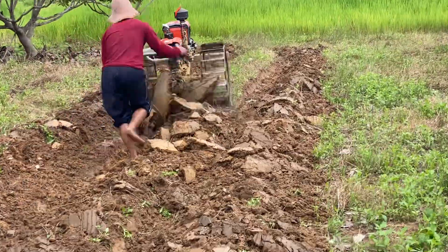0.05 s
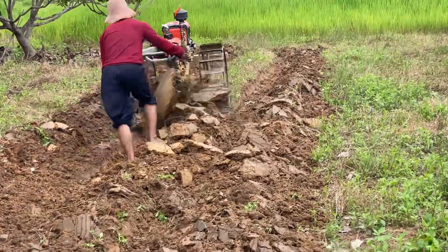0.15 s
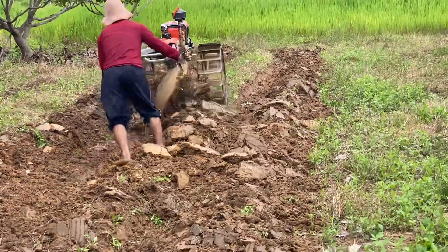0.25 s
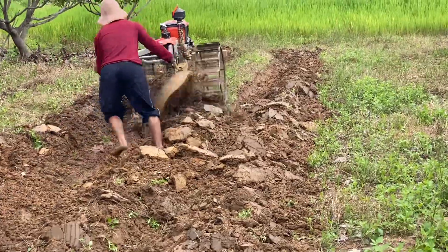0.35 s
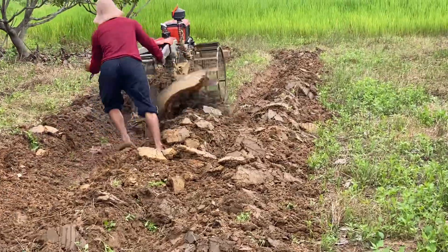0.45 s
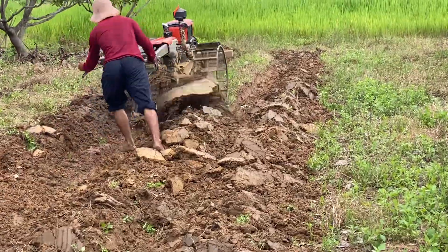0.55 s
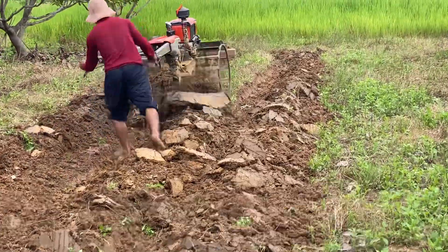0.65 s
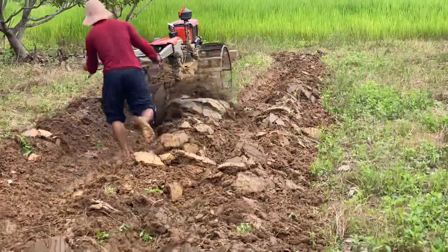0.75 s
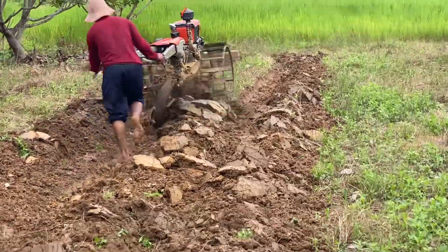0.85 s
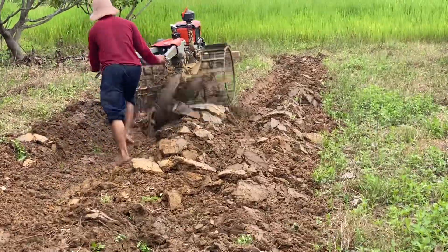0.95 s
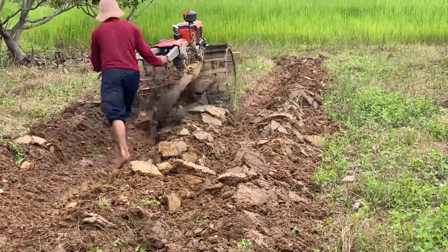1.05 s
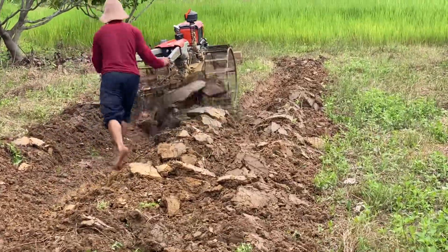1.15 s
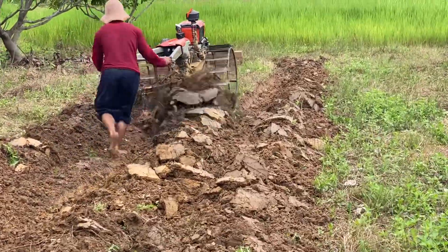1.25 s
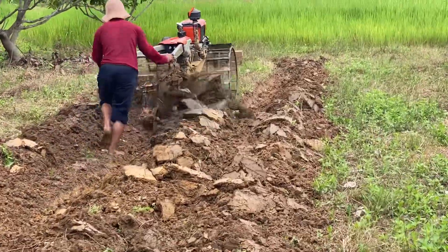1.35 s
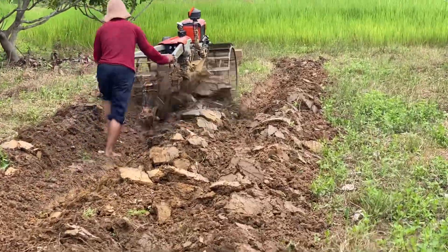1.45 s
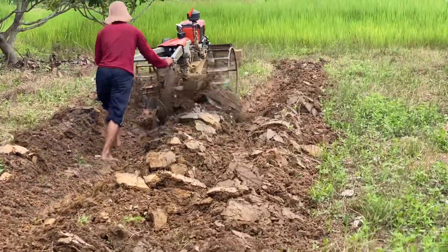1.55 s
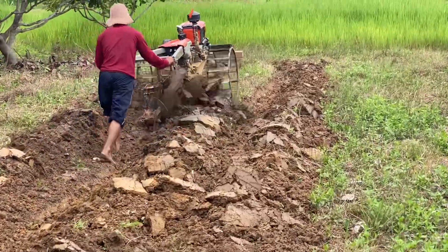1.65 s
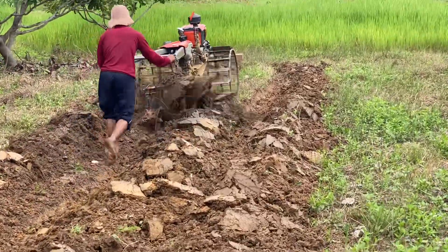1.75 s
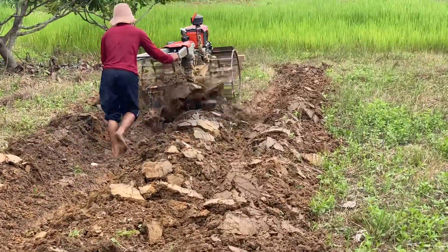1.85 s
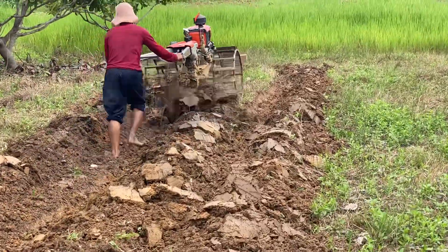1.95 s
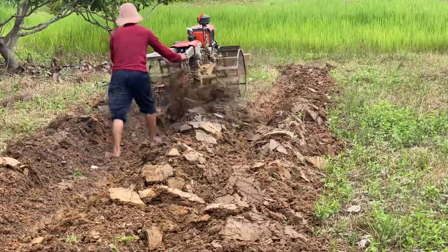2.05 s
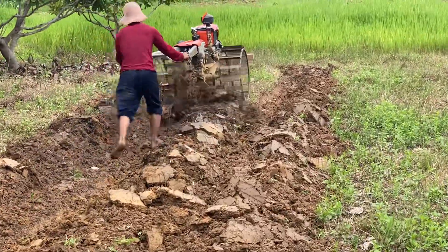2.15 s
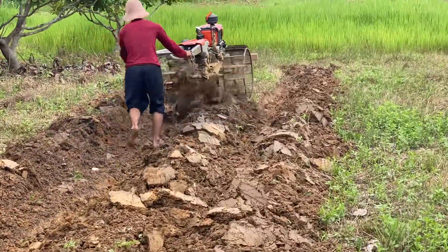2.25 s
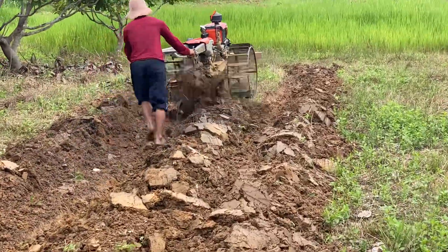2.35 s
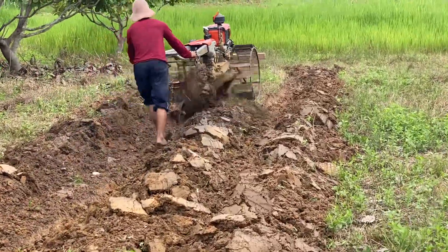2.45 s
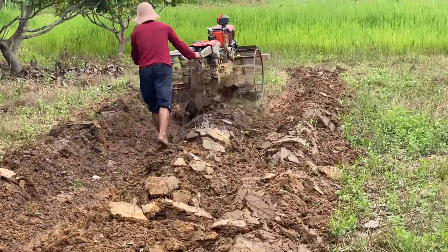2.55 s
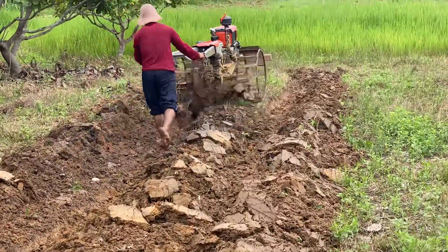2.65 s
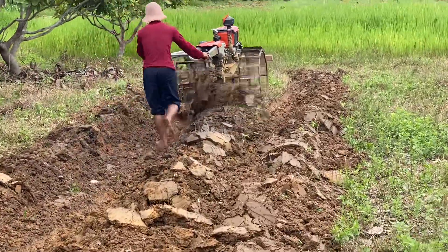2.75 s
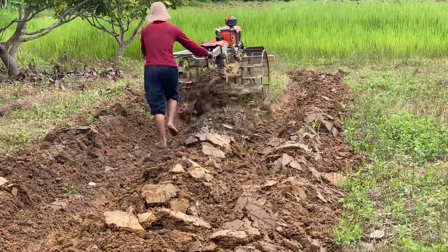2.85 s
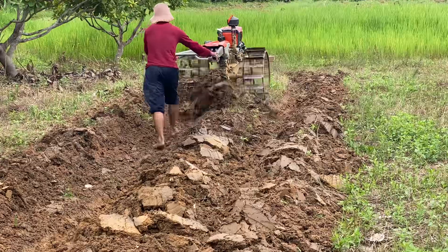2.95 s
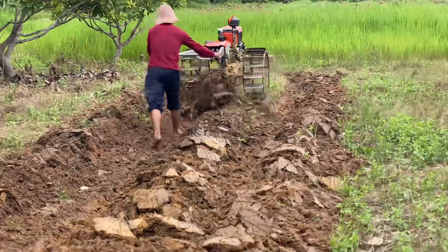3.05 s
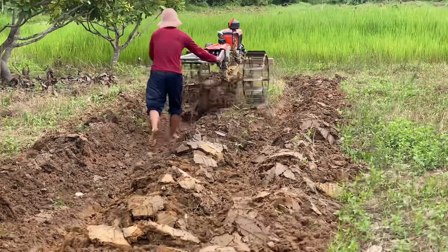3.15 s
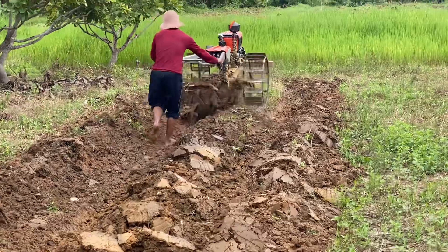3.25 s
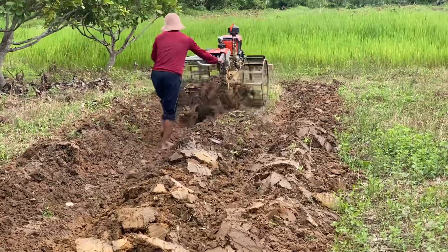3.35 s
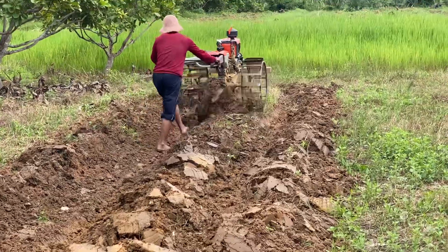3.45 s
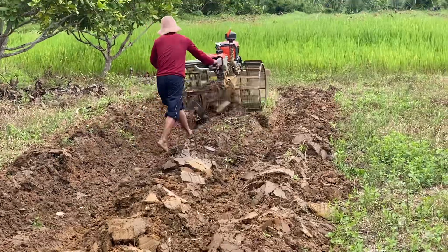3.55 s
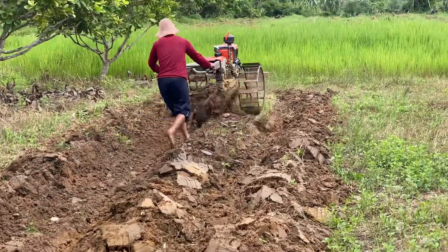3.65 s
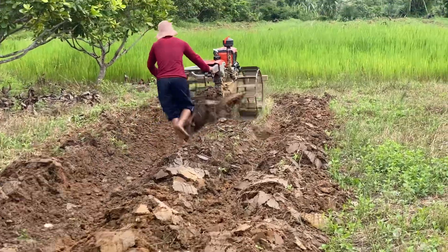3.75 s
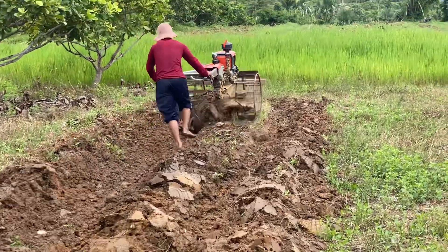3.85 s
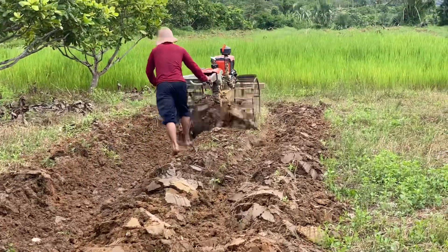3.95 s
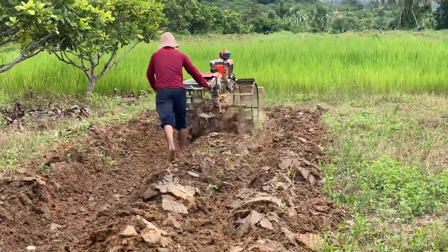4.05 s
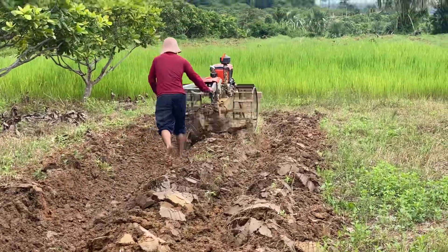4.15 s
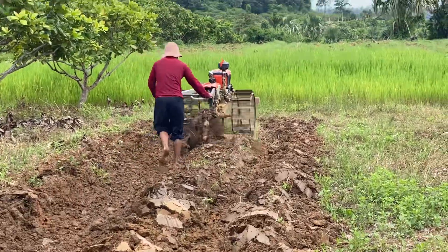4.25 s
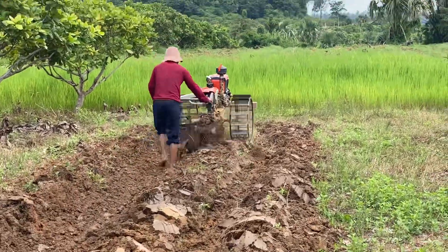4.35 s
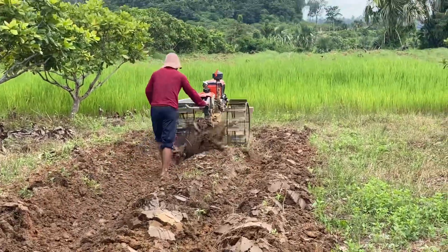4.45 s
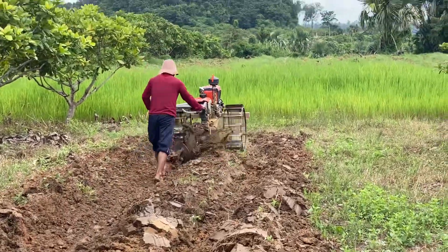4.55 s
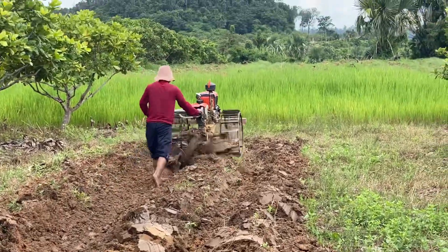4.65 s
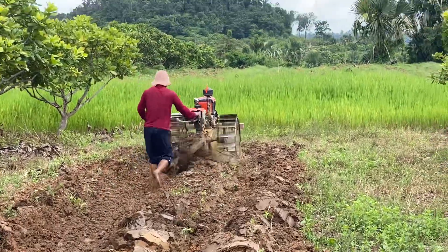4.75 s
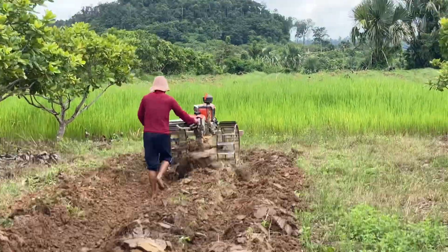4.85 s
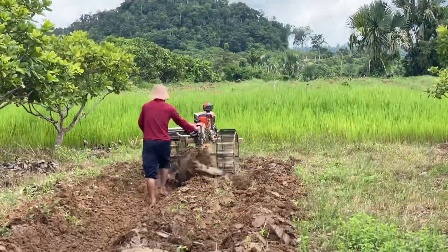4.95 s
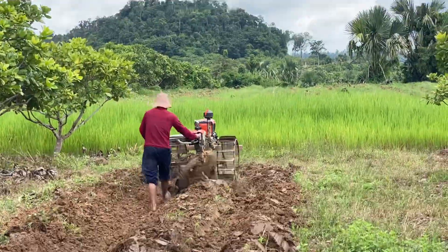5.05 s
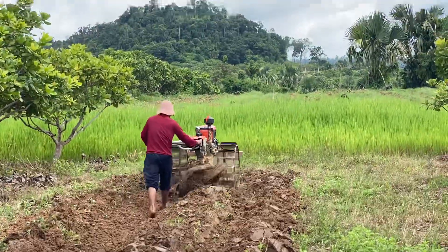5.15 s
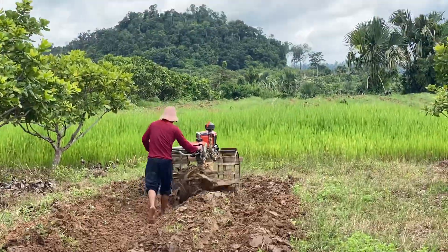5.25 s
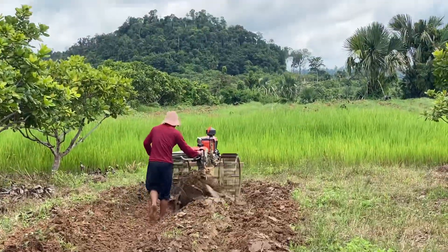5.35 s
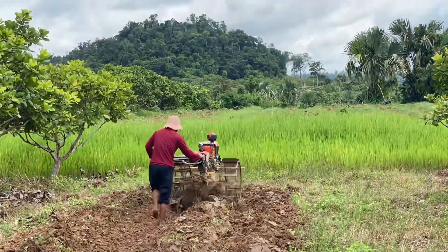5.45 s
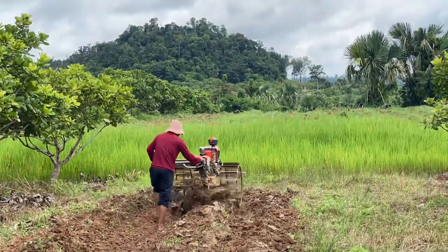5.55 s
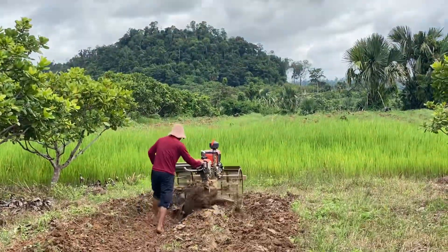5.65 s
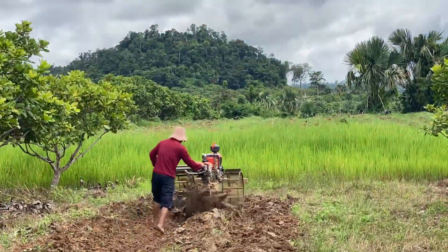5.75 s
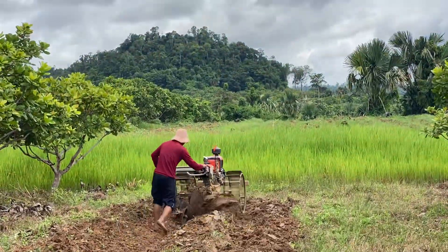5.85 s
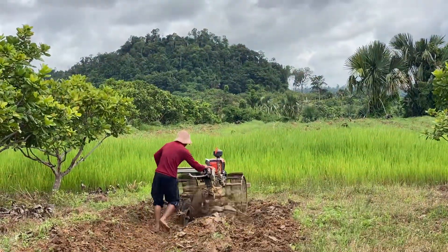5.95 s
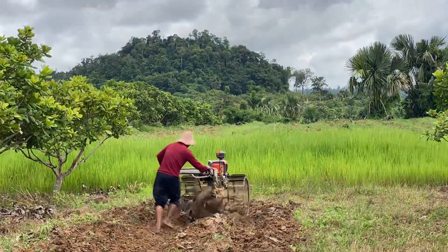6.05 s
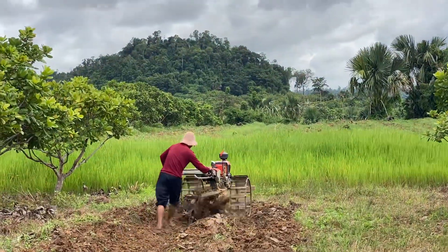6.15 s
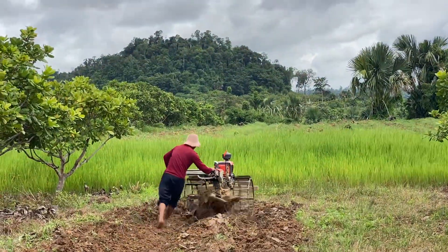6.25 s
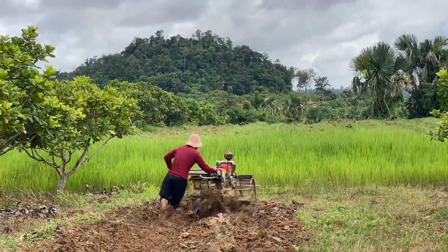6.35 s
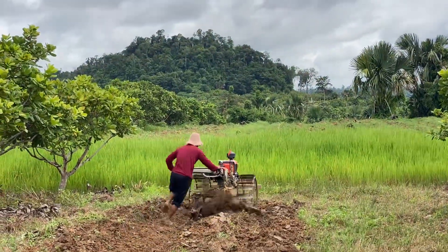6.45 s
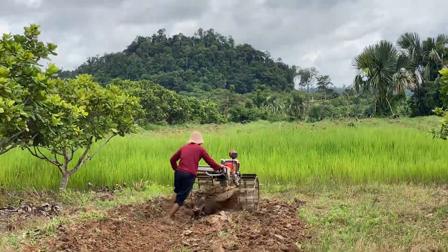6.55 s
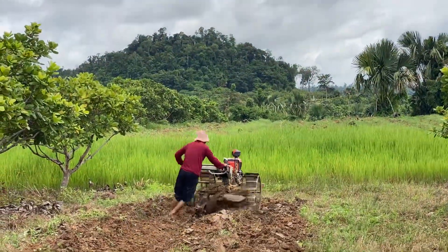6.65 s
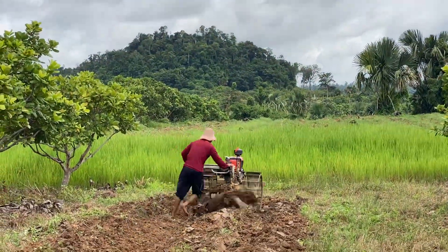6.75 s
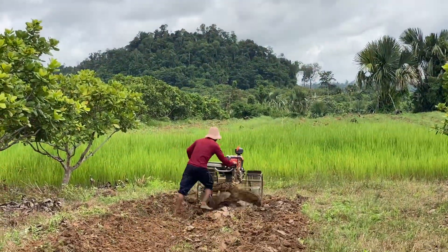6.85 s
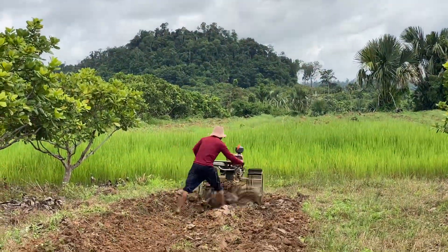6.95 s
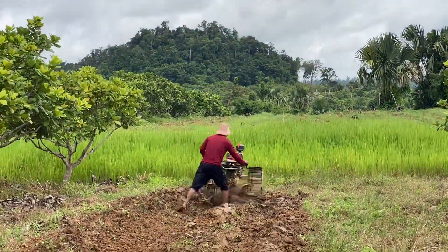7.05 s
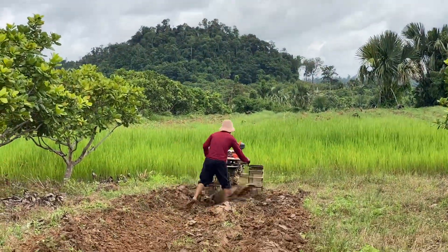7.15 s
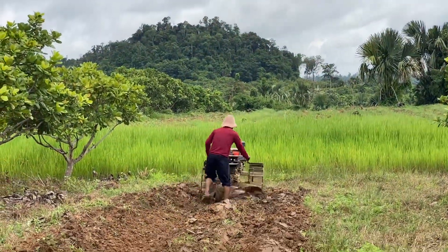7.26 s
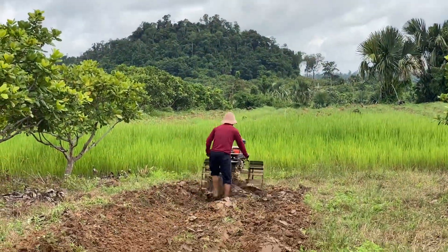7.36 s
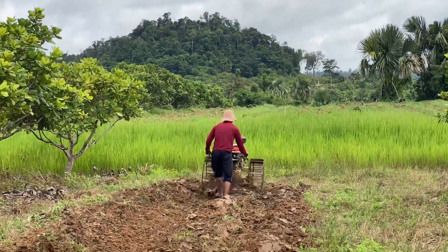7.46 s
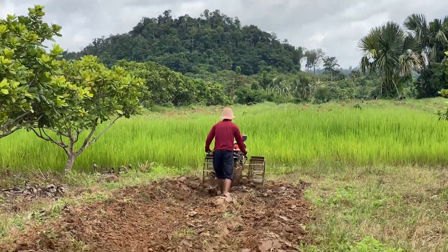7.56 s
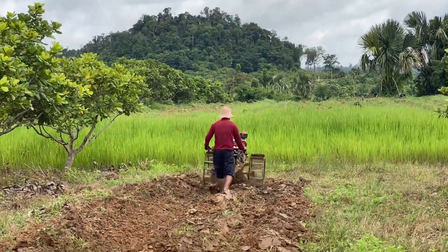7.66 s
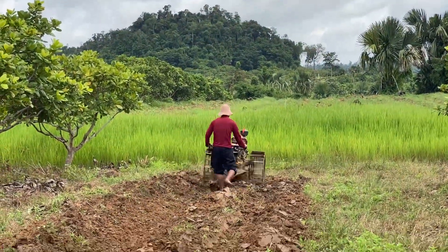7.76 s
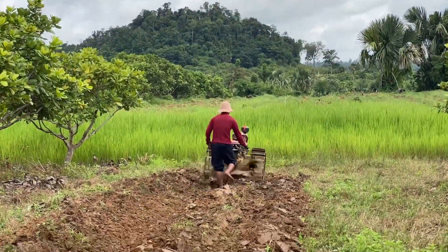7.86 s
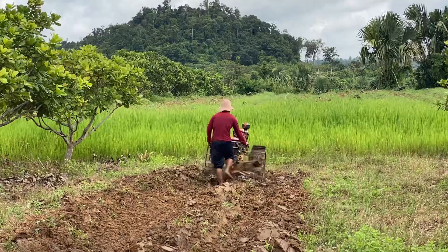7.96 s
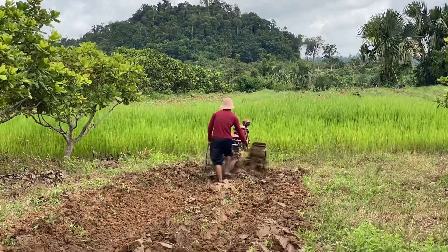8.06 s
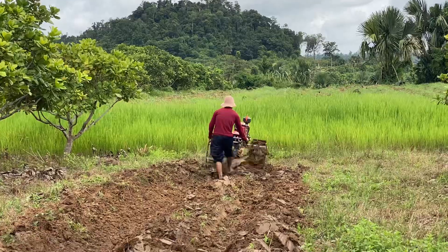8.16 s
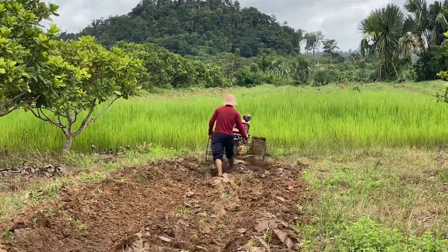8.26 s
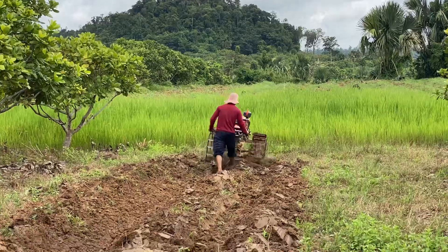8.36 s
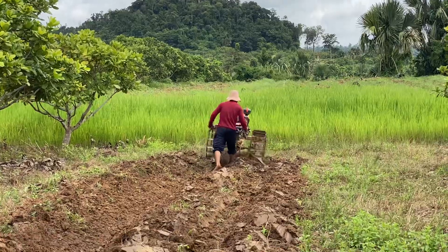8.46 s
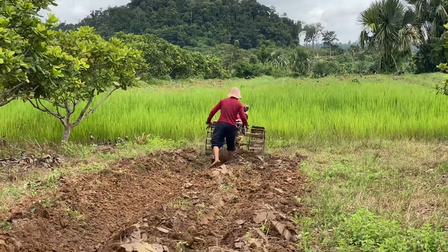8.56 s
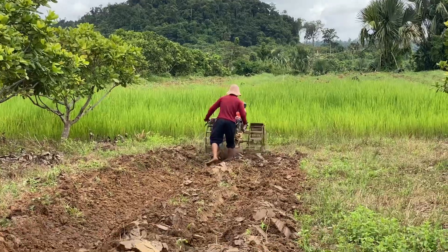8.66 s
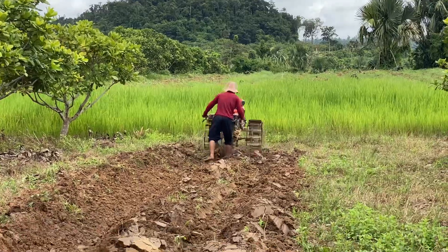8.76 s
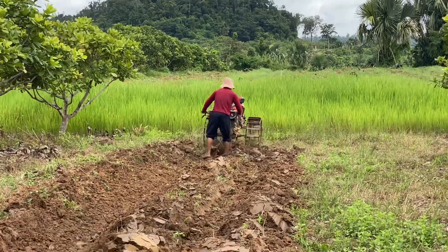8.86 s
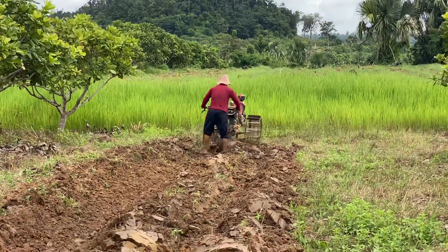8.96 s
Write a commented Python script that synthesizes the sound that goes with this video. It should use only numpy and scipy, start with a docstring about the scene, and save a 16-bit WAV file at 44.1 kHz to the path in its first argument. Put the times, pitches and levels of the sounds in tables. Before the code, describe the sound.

A single-cylinder diesel walking tractor plows an open field a few meters straight ahead of the microphone. It chugs rapidly, with deep exhaust thuds, hard knocking and rattling metal covers. After about three seconds the engine briefly eases off, then picks up at a slower, laboring beat and gradually moves away. A faint, thin belt squeal, occasional clanks and a few gritty scrapes through dry soil accompany it.

```python
"""The thud and knock of a single-cylinder four-stroke diesel, about nine firings a second, towing a plough.
Each cycle combustion rings the block, exhaust gas thuds and spits, the intake gulps, valves and covers
clack. After three seconds the governor briefly cuts the fuel; the engine then runs slower and draws away
across the field. Behind it gears chatter, a slipping belt squeals, a loose guard sings, a dry joint
chirps for a second and the plough now and then scrapes through clods."""
import sys
import numpy as np
from scipy import signal
from scipy.fft import rfft, irfft, next_fast_len
from scipy.io import wavfile
from scipy.ndimage import uniform_filter1d

SR = 44100
rng = np.random.default_rng(int(sys.argv[2]) if len(sys.argv) > 2 else 0)


def transcribe(signal):
    """Save signal, clipped to [-1, 1], as a 16-bit WAV file at the path in sys.argv[1]."""
    frames = np.atleast_2d(signal).T
    limited = np.clip(frames, -1, 1)
    pcm = np.round(limited * 32767).astype(np.int16)
    wavfile.write(sys.argv[1], SR, pcm)


N = 397773
TIME_S = np.arange(N) / SR
FFT_SIZE = next_fast_len(N + SR)
FREQ_HZ = np.maximum(np.arange(FFT_SIZE // 2 + 1) * SR / FFT_SIZE, 1e-3)


# silencer and pipe air modes: pitch_hz, width_hz, gain_db, polarity
PIPE_MODES = [(65.5, 21, 18, -1), (100.3, 13.2, 17, 1), (152.2, 34, 18, 1), (201.5, 14.4, 13.5, 1),
              (243, 18, 8, -1), (291, 25, 2.5, 1)]
# silencer shell modes: pitch_hz, width_hz, gain_db, polarity
SHELL_MODES = [(380, 113, -5, 1), (865, 60, -4.5, -1), (3100, 160, -48, 1)]
# gas bark: freq_hz, gain_db
BARK_SPECTRUM = [(150, 20), (280, 2), (420, 6.5), (650, -11), (1050, -3.5), (1450, 7), (1750, -18),
                 (3100, -27.5), (4000, -49), (9000, -68.5)]
# gas spit: freq_hz, gain_db
SPIT_SPECTRUM = [(380, -5), (540, 8), (750, -3), (1000, -20.5), (2000, -2.5), (3100, 0), (3700, -10),
                 (4600, -4.5), (5800, -10.5), (6650, -5), (7200, -16), (9500, -15), (13000, -37),
                 (15500, -25)]
# silencer rattle as the governor eases off: time_s, level_db
SILENCER_RATTLE = [(3.15, -68), (3.4, -47.5), (3.6, -57), (3.9, -60), (4.1, -78.5)]

def exhaust(fuel):
    """The valve opens: a slug of gas rings the silencer, with a rough bark and, under load, a spit."""
    opens_s = crank(0.216)
    load_db = 12 * (fuel - 1) + distance_db(opens_s)
    spit_db = -26 + 41.5 * (fuel - 1) + distance_db(opens_s)
    coasting = np.clip(1 - 2 * fuel, 0, 1)
    thud = slug(opens_s, load_db + 27 - 3 * coasting, PIPE_MODES)
    bark = burst(opens_s + 0.0019, load_db - 29, BARK_SPECTRUM,
                 rise_s=0.001, decay_s=0.021, tail_db=-12, tail_s=0.025, alike=0.092)
    spit = burst(opens_s + 0.0013, spit_db, SPIT_SPECTRUM,
                 rise_s=0.0031, decay_s=0.0023, tail_db=-25.5, tail_s=0.055, alike=0.56)
    # a slow, labouring engine blows down harder and shakes the metal too
    labour_db = -25 * speed_octaves(opens_s)
    shake_db = load_db + 1.5 + labour_db + 2 * rng.standard_normal(len(opens_s))
    shake = filtered(impulses(opens_s + 0.003314, shake_db), resonances(BLOCK_MODES + SHELL_MODES))
    rattle = noise(resonances(SHELL_MODES)) * undb(curve(SILENCER_RATTLE, TIME_S) + 4 * wander(41))
    return thud + bark + spit + shake + rattle


# air cleaner and inlet modes: pitch_hz, width_hz, gain_db, polarity
AIRBOX_MODES = [(106, 20.2, 18, -1), (134.8, 129, 9.5, 1), (241.4, 19, 7, -1)]
# air passing the inlet valve: freq_hz, gain_db
RUSH_SPECTRUM = [(300, 14), (700, -35), (1000, -2), (1250, 27), (1550, -1), (1900, -32), (3500, 8.5),
                 (8000, -35)]

def intake():
    """The inlet valve jolts the air column as it opens and as it shuts; air rushes in between."""
    opens_s, shuts_s = crank(0.502), crank(0.769)
    suction_db = 1.05 + 10.5 * speed_octaves(opens_s) + distance_db(opens_s)
    gulp = slug(opens_s, suction_db + 23.5, AIRBOX_MODES) + slug(shuts_s, suction_db + 25, AIRBOX_MODES)
    clack = burst(opens_s + 0.00162, 1.6 * suction_db - 33, BARK_SPECTRUM,
                  rise_s=0.00077, decay_s=0.005, tail_db=18, tail_s=0.0087, alike=0.53)
    rush = burst(crank(0.61), 0.82 * suction_db - 45, RUSH_SPECTRUM,
                 rise_s=0.015, decay_s=0.0091, tail_db=-38, tail_s=0.023, alike=0.31)
    return gulp + clack + rush


# cylinder block modes: pitch_hz, width_hz, gain_db, polarity
BLOCK_MODES = [(300, 43, -21, 1), (707, 35, -16.5, -1), (796, 29, -11.5, 1), (898, 33, -10.5, 1),
               (1158, 32, -11.5, -1), (1206, 52, -4, 1), (1304, 33, -17, 1), (1379, 32, -15, -1),
               (1438, 33, -6, -1), (1473, 28, -4.5, 1), (1522, 59, -0.5, -1), (1597, 73, -11, 1),
               (1810, 60, -18, -1), (2217, 59, -17.5, -1), (2773, 31, -17.5, -1), (3100, 35, -20, -1)]
# engine mount and frame modes: pitch_hz, width_hz, gain_db, polarity
FRAME_MODES = [(470, 45, -5, 1), (570, 37, -1, -1), (699, 48, -1.5, 1), (804, 29, 0, -1),
               (895, 45, -0.5, 1)]
# combustion crack: freq_hz, gain_db
CRACK_SPECTRUM = [(250, -23), (450, -1), (900, -4.5), (1200, -11), (1550, 11), (1750, -7.5), (2800, -9.5),
                  (3800, -20), (6500, -23.5), (9000, -45), (15000, -76)]
# hardness of the knock: time_s, gain_db
KNOCK_HARDNESS = [(0, -28), (1.77, -27), (1.88, -23), (2.3, -25.5), (2.5, -27), (2.7, -23), (3.15, -22),
                  (3.34, -42.5), (3.68, -42.5), (3.86, -29), (4.25, -32), (4.45, -32.5), (4.57, -28.5),
                  (6.9, -28.5), (7.55, -35), (8.19, -29.5), (8.33, -37.5), (8.7, -35)]

def combustion_knock():
    """Each firing cracks and rings block and covers; then the piston slaps and the frame is jolted."""
    fired_s, slaps_s = crank(0), crank(0.085)
    knock_jitter, slap_jitter, lag_jitter = rng.standard_normal((len(fired_s), 3)).T
    knock_db = curve(KNOCK_HARDNESS, fired_s) + distance_db(fired_s) + 0.5 * knock_jitter
    slap_db = 0.73 * knock_db + 21.5 + 2 * slap_jitter
    frame_db = 10.5 + 41 * (curve(GOVERNOR_FUEL, slaps_s) - 1) + distance_db(slaps_s)
    ring = strike(fired_s + 0.0008, knock_db + 47, BLOCK_MODES, scatter=0.1)
    slap = strike(slaps_s + 0.00201 * lag_jitter, slap_db, BLOCK_MODES, scatter=1.0)
    covers = strike(fired_s + 0.002013, 0.66 * knock_db + 20.5, COVER_MODES, scatter=0.73)
    frame = strike(slaps_s, frame_db, FRAME_MODES, scatter=0.87)
    crack = burst(fired_s + 0.00046, 0.57 * knock_db - 17, CRACK_SPECTRUM,
                  rise_s=0.0009, decay_s=0.015, tail_db=-6, tail_s=0.033, alike=0.34)
    return ring + slap + covers + frame + crack


# thin cover and bracket modes: pitch_hz, width_hz, gain_db, polarity
COVER_MODES = [(570, 49, -11.5, 1), (958, 57, -2.5, -1), (1167, 28, -1.5, 1), (1400, 45, -0.5, -1),
               (1475, 12.3, 2.5, 1), (1920, 44, -10, -1), (2310, 62, -8.5, 1), (2670, 50, -11, -1),
               (2850, 43, -8, 1), (3170, 43, -9, -1), (4480, 90, -17.5, 1), (4840, 76, -19.5, -1)]
# hard cover clanks as the engine labours: start_s, gain_db
COVER_CLANKS = [(4.36, 11), (4.48, 9), (5.552, 8.5), (7.217, 5), (7.46, 11), (7.583, 8), (7.708, 2),
                (7.965, -3), (8.095, 4), (8.644, 8), (8.786, 8.5)]

def loose_metal(rattles_per_s=45):
    """Exhaust blows shake the covers, valve gear clatters once a cycle, loose parts rattle at random."""
    blows_s, tappets_s = crank(0.245), crank(0.65)
    shake_jitter, tappet_jitter, lag_jitter = rng.standard_normal((len(blows_s), 3)).T
    shake_db = 7 + 16 * (curve(GOVERNOR_FUEL, blows_s) - 1) + distance_db(blows_s) + 3 * shake_jitter
    covers = strike(blows_s, shake_db, COVER_MODES, scatter=0.61)
    clanks = strike(*np.transpose(COVER_CLANKS), COVER_MODES, scatter=0.5)
    tappet_db = distance_db(tappets_s) + 1.3 * tappet_jitter
    valves = strike(tappets_s + 0.005 * lag_jitter, tappet_db, BLOCK_MODES, scatter=0.66)
    rattles_s = np.sort(rng.uniform(0, N / SR, int(rattles_per_s * N / SR)))
    rattle_db = -6 + distance_db(rattles_s) + 5 * rng.standard_normal(len(rattles_s))
    rattles = strike(rattles_s, rattle_db, COVER_MODES, scatter=1.6)
    return covers + clanks + valves + rattles


# gear train and sheet metal: freq_hz, gain_db
CHATTER_SPECTRUM = [(30, -12), (100, 8.5), (250, 14), (400, -4), (650, -4.5), (820, 1), (1100, -2),
                    (1500, -5.5), (1800, -5), (3100, -10.5), (3800, -14), (6500, -19), (9000, -18.5),
                    (13000, -40.5)]

def gears():
    """Dense chatter, stirred by each power stroke and dying down before the next."""
    fired_s = crank(0)
    phase = np.interp(TIME_S, fired_s, np.arange(len(fired_s))) % 1
    stirred_db = np.interp(phase, [0, 0.3, 0.7, 1], [-0.5, 2.5, -2.0, -4.5])
    grain = undb(1.9 * wander(250) + wander(35))
    level_db = -38 + 11 * speed_octaves(TIME_S) + distance_db(TIME_S) + stirred_db
    return noise(resonant_free := spectrum(CHATTER_SPECTRUM)) * grain * undb(level_db)


# belt on its pulley: pitch_hz, width_hz, gain_db, polarity
BELT_MODES = [(7490, 51, 1.5, 1), (7425, 140, -4, 1), (7830, 90, -6, 1), (12900, 360, -23.5, 1),
              (14510, 104, -14, 1)]
# belt slips: centre_s, half_width_s, boost_db
BELT_SLIPS = [(0.02, 0.039, 2), (0.876, 0.088, 5), (1.564, 0.056, 7), (2.604, .08, 6.5), (2.782, 0.048, 7),
              (2.985, 0.067, 7.5), (3.2, .08, 5), (3.6, 0.028, 6), (4.032, 0.1, 5), (4.353, .25, 4.5),
              (4.755, 0.05, 5.5), (5.32, 0.12, 3.5), (5.57, 0.034, 5), (5.97, 0.29, 7.5), (6.767, .08, 5),
              (7.966, 0.063, 7.5), (8.396, 0.069, 2)]

def belt():
    """A thin, fluttering squeal, stronger under load, that swells whenever the belt slips."""
    slip_db = sum(boost_db * np.exp(-((TIME_S - centre_s) / half_width_s) ** 2)
                  for centre_s, half_width_s, boost_db in BELT_SLIPS)
    level_db = -53.5 + 7 * (curve(GOVERNOR_FUEL, TIME_S) - 1) + distance_db(TIME_S) + slip_db
    return noise(resonances(BELT_MODES, order=2)) * undb(level_db + 2 * wander(25))


# plough and cage wheels hitting clods: start_s, level_db, decay_s
CLOD_SCRAPES = [(1.17, -37, 0.0099), (2.286, -39, 0.034), (4.372, -47, .03), (4.489, -45, 0.016),
                (6.762, -31.5, 0.031), (6.963, -38, 0.035)]
# steel on soil: freq_hz, gain_db
SCRAPE_SPECTRUM = [(500, -1), (1500, 11), (2700, 3), (3400, 6), (4000, 1.5), (4600, -1), (5600, -1.5),
                   (7000, -8), (11000, -15), (15500, -24)]
# plough blade modes: pitch_hz, width_hz, gain_db, polarity
BLADE_MODES = [(3370, 40, -1, 1), (3500, 15, -1.5, -1), (4280, 33, -6, 1), (4610, 26, 1, -1)]

def plough():
    """Gritty scrapes of steel through dry clods; the blade rings with each."""
    scrapes = sum(burst(np.array([start_s]), level_db, SCRAPE_SPECTRUM,
                        rise_s=0.00077, decay_s=decay_s, tail_db=-35, tail_s=0.036, alike=0)
                  for start_s, level_db, decay_s in CLOD_SCRAPES)
    grit = undb(0.83 * wander(700))
    starts_s, levels_db, _ = np.transpose(CLOD_SCRAPES)
    blade = strike(starts_s + 0.0022, levels_db + 41.5, BLADE_MODES, scatter=0.3)
    return scrapes * grit + blade


# singing guard: time_s, level_db
GUARD_LEVEL = [(0, -61), (.3, -50.5), (1.5, -50), (3.2, -51), (3.45, -64), (3.9, -58), (4.3, -53.5),
               (4.7, -55.5), (9, -68)]

def guard():
    """A loose metal guard sings a thin, wavering tone."""
    pitch_hz = 1043 + 8 * wander(5) + 9 * wander(40)
    tone = np.sqrt(2) * np.sin(2 * np.pi * np.cumsum(pitch_hz) / SR)
    return tone * undb(curve(GUARD_LEVEL, TIME_S) + 2 * wander(18))


def dry_joint(start_s=0.7, end_s=1.8):
    """A dry joint briefly gives a faint, scratchy rising chirp once a cycle."""
    times_s = crank(0.53)
    times_s = times_s[(times_s > start_s) & (times_s < end_s)]
    t = TIME_S[:SR // 10]
    chirp = np.sin(2 * np.pi * (3300 * t + 1500 * t ** 2)) * np.exp(-((t - 0.012) / 0.0076) ** 2)
    rubs = impulses(times_s, -47 + rng.standard_normal(len(times_s)))
    return filtered(rubs, rfft(chirp, FFT_SIZE)) * wander(400)


# engine speed: time_s, firing_rate_hz
ENGINE_SPEED = [(0.0, 9.476), (1.43, 9.404), (1.64, 9.717), (1.97, 9.505), (3.17, 9.637), (3.6, 8.657),
                (3.84, 7.572), (4.25, 7.708), (4.52, 8.521), (5.07, 8.34), (5.7, 8.511), (6.66, 8.237),
                (6.94, 8.575), (8.23, 7.498), (8.51, 6.952), (9.0, 7.358)]

def crank(phase, start_phase=0.2003):
    """Times at which each two-revolution cycle reaches a phase (0 to 1, firing at 0)."""
    cycles_run = start_phase + np.cumsum(curve(ENGINE_SPEED, TIME_S)) / SR
    cycles = np.arange(int(cycles_run[-1] - 0.5) + 1)
    first_firing_s = -start_phase / ENGINE_SPEED[0][1]
    return np.interp(cycles + phase, np.append(0, cycles_run), np.append(first_firing_s, TIME_S))


def speed_octaves(times_s, full_speed_hz=9.5):
    """Doublings of the firing rate relative to full speed."""
    return np.log2(curve(ENGINE_SPEED, times_s) / full_speed_hz)


# governor setting: time_s, full_load_share
GOVERNOR_FUEL = [(0, 0.92), (1.57, 0.97), (1.78, 0.79), (3.15, 0.81), (3.35, 0.4), (3.62, .05),
                 (3.81, 0.24), (3.94, 0.78), (4.45, 0.99), (4.8, 0.79), (6.6, 0.8), (6.95, 0.88),
                 (7.2, 0.7), (8.8, 0.65)]
# underfuelled firings: time_s, missing_share
LEAN_CYCLES = [(0.506, 0.086), (4.688, 0.29), (4.925, 0.24), (5.639, 0.12), (6.113, 0.15), (7.068, 0.13),
               (8.193, 0.16), (8.89, 0.33)]

def fuel_per_cycle():
    """Share of full load burnt: the governor's setting, a little chance and a few lean firings."""
    fired_s = crank(0)
    fuel = curve(GOVERNOR_FUEL, fired_s) + 0.021 * rng.standard_normal(len(fired_s))
    for time_s, missing_share in LEAN_CYCLES:
        fuel[np.argmin(abs(fired_s - time_s))] -= missing_share
    return fuel


# tractor to listener: time_s, distance_m
TRACTOR_DISTANCE = [(0, 7), (3.2, 6.94), (9, 10.87)]

def distance_db(times_s):
    """Inverse-distance gain relative to the starting position."""
    return 20 * np.log10(TRACTOR_DISTANCE[0][1] / curve(TRACTOR_DISTANCE, times_s))


def slug(times_s, gain_db, modes, corner_hz=78):
    """Soft pushes of gas, a few milliseconds long, into air resonances."""
    response = resonances(modes) / (1 + 1j * FREQ_HZ / corner_hz) ** 2
    return filtered(impulses(times_s + 0.005, gain_db), response)


def burst(times_s, level_db, points, rise_s, decay_s, tail_db, tail_s, alike):
    """Coloured noise puffs with two decays; the power share 'alike' is the same in every puff."""
    t = TIME_S[:SR // 2]
    puff = (1 - np.exp(-(t / rise_s) ** 2)) * (np.exp(-t / decay_s) + undb(tail_db) * np.exp(-t / tail_s))
    puff /= puff.max()
    hits = impulses(times_s, level_db)
    fresh = filtered(hits, rfft(puff, FFT_SIZE)) * rng.standard_normal(N)
    repeated = filtered(hits, rfft(puff * rng.standard_normal(len(t)), FFT_SIZE))
    puffs = np.sqrt(1 - alike) * fresh + np.sqrt(alike) * repeated
    response = spectrum(points)
    return filtered(puffs, response / np.sqrt(np.mean(response ** 2)))


def strike(times_s, gain_db, modes, scatter, contact_hz=5270):
    """Blows on metal, each shared differently among the modes; finite contact time dulls the treble."""
    pitch_hz, width_hz, mode_db, polarity = np.transpose(modes)
    t = TIME_S[:SR // 5]
    rings = np.exp(np.pi * np.outer(2j * pitch_hz - width_hz, t))
    chance = rng.standard_normal((len(times_s), len(pitch_hz), 2)) @ [1, 1j]
    mode_gains = np.sign(polarity) * undb(mode_db) * 2 * np.pi * width_hz / SR
    weights = mode_gains * (1 + scatter * chance) / np.sqrt(1 + 2 * scatter ** 2)
    starts = np.round(times_s * SR).astype(int)
    blows = np.zeros(FFT_SIZE)
    for start, gain, ring in zip(starts, undb(gain_db), (weights @ rings).real):
        blows[start + np.arange(len(t))] += gain * ring
    return filtered(blows[:N], 1 / (1 + 1j * FREQ_HZ / contact_hz - (FREQ_HZ / contact_hz) ** 2) ** 2)


def impulses(times_s, gain_db):
    """One impulse per event; those before the start wrap round so that their ring is heard."""
    train = np.zeros(FFT_SIZE)
    np.add.at(train, np.round(times_s * SR).astype(int) % FFT_SIZE, undb(gain_db))
    return train


def resonances(modes, order=1):
    """Summed response of band-pass modes; a higher order gives steeper skirts."""
    response = 0
    for pitch_hz, width_hz, gain_db, polarity in modes:
        detuning = (FREQ_HZ / pitch_hz - pitch_hz / FREQ_HZ) * pitch_hz / width_hz
        response += np.sign(polarity) * undb(gain_db) / (1 + 1j * detuning) ** order
    return response


def spectrum(points):
    """Response through (freq_hz, gain_db) points."""
    freq_hz, gain_db = np.transpose(points)
    return undb(np.interp(np.log(FREQ_HZ), np.log(freq_hz), gain_db))


def noise(response):
    """Filtered noise of rms 1."""
    x = filtered(rng.standard_normal(N), response)
    return x / x.std()


def wander(rate_hz):
    """Smooth random drift, spread near 1."""
    hold = int(SR / rate_hz)
    steps = np.repeat(rng.standard_normal(N // hold + 1), hold)
    return np.sqrt(2) * uniform_filter1d(uniform_filter1d(steps, hold), hold)[:N]


def filtered(x, response):
    """Apply a frequency response."""
    return irfft(rfft(x, FFT_SIZE) * response, FFT_SIZE)[:N]


def curve(rows, times_s):
    """Interpolate (time_s, value) rows."""
    return np.interp(times_s, *np.transpose(rows))


def undb(db):
    """Decibels to gain."""
    return 10 ** (np.asarray(db) / 20)


def scene():
    """The tractor is straight ahead; the open field scatters a little of its clatter to the sides."""
    engine = exhaust(fuel_per_cycle()) + intake() + combustion_knock() + loose_metal()
    tractor = engine + gears() + belt() + guard() + dry_joint() + plough()
    echo = rng.standard_normal(SR // 2) * np.exp(-TIME_S[:SR // 2] / 0.039)
    field = spectrum([(60, -37), (250, -25), (1300, -11.5), (3000, -16.5), (5000, -47), (8000, -52)])
    side = filtered(tractor, field * rfft(echo / np.linalg.norm(echo), FFT_SIZE))
    return np.array([tractor + side, tractor - side])


def record(dry):
    """Two band-limited microphone ports differ slightly in colour; top treble reaches the left later."""
    low_cut_hz, high_cut_hz, lag_above_hz, lag_s = 43, 15750, 6800, 1 / 3550
    dry = signal.sosfilt(signal.butter(4, low_cut_hz, "high", fs=SR, output="sos"), dry)
    balance = spectrum([(50, -0.17), (200, -0.59), (600, -1.27), (1100, -0.73),
                        (1500, 1.0), (2200, 0.21), (4000, 0)])
    lag = np.exp(-2j * np.pi * np.maximum(FREQ_HZ - lag_above_hz, 0) * lag_s)
    ports = np.array([filtered(dry[0], balance * lag), filtered(dry[1], 1 / balance)])
    return signal.sosfilt(signal.ellip(10, 0.2, 80, high_cut_hz, fs=SR, output="sos"), ports)


dry = scene()
out = record(dry)
transcribe(out)
```